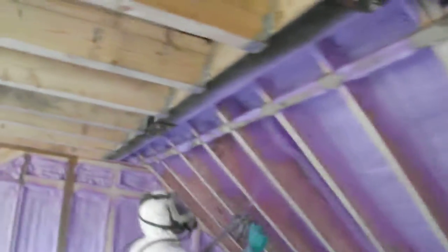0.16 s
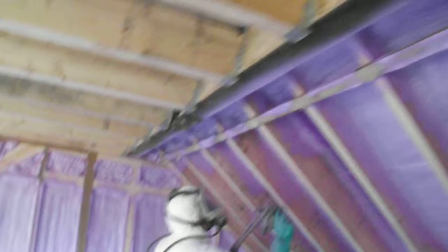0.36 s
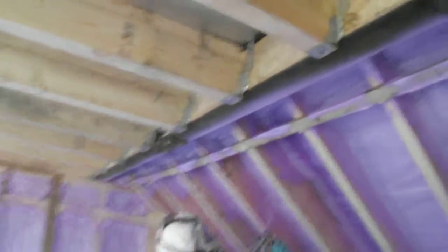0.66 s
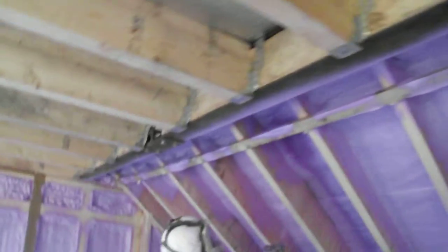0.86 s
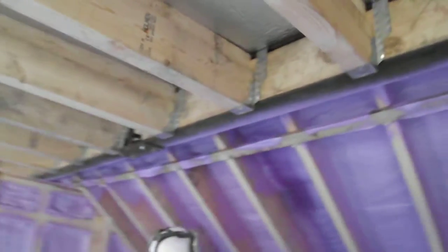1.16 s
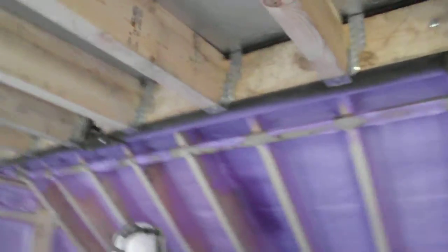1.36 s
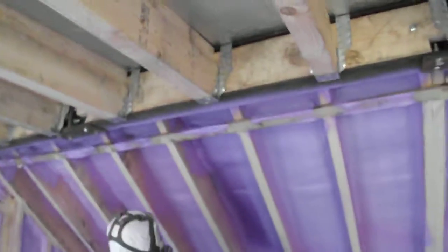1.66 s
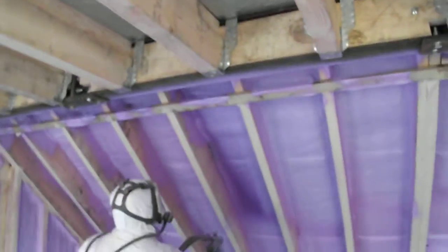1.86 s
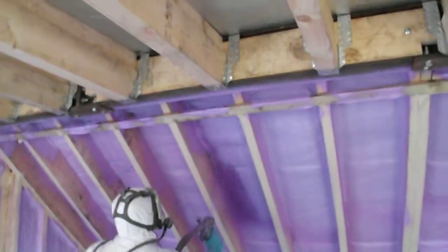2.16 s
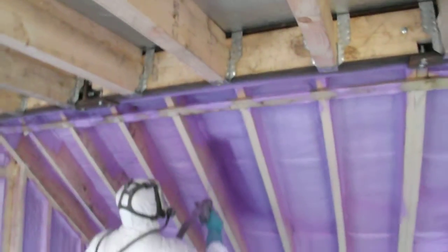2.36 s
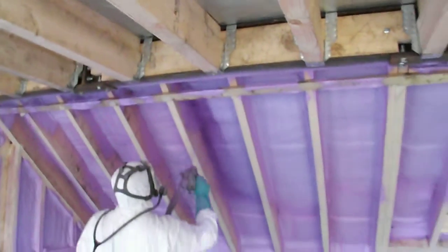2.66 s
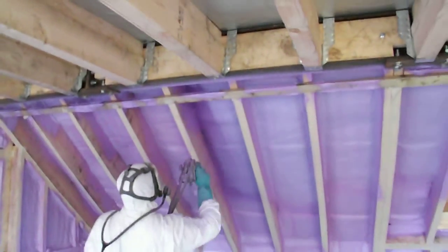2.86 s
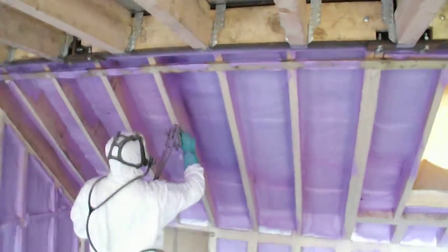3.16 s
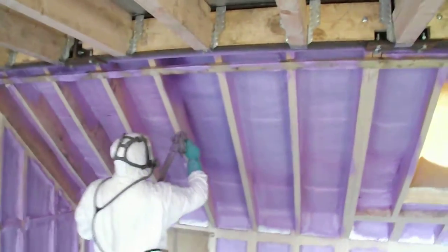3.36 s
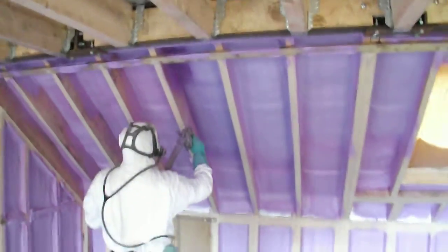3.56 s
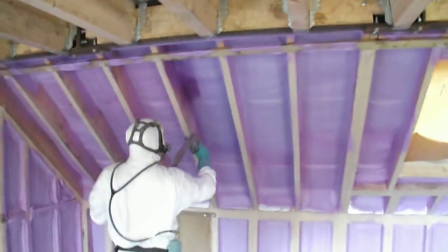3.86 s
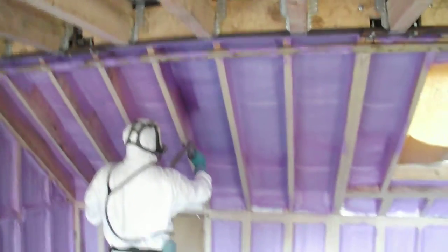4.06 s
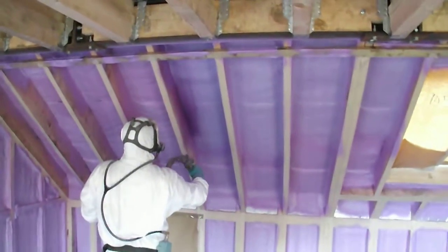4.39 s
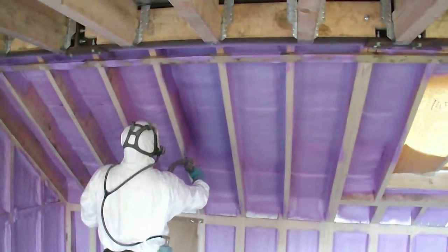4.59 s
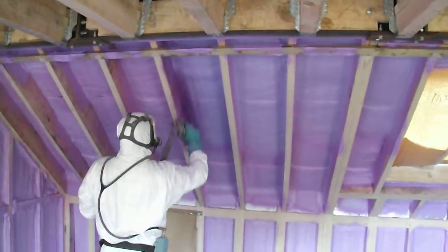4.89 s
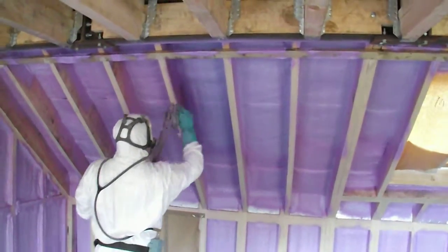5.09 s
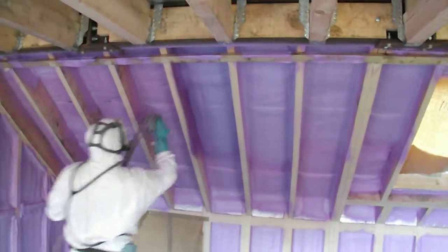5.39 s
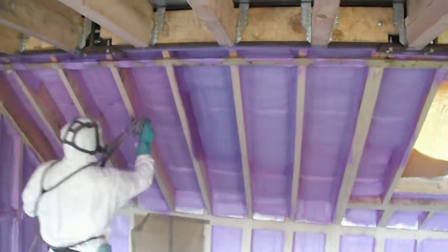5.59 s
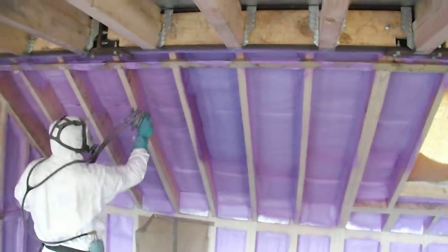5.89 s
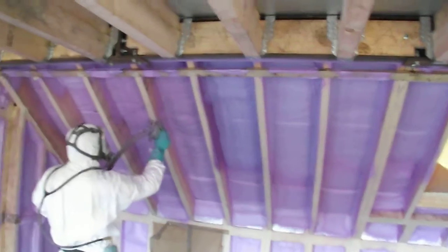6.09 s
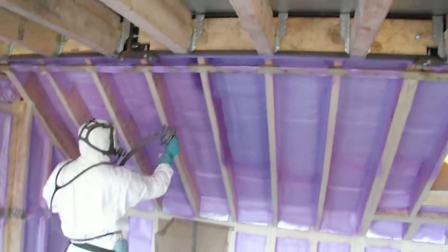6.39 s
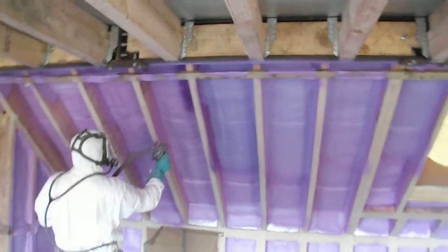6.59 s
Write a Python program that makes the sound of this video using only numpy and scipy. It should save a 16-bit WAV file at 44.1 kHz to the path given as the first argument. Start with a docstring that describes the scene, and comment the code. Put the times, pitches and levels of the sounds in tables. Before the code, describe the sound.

A spray gun roars wet, spattering foam in short bursts, hissing out between passes, while hard wooden knocks crack through a timber loft.

```python
"""A spray gun lays foam on a roof slope in a timber loft, over a steady faint hose leak. It opens mid-pass:
the held trigger gives a wet, spattering roar of filtered noise and clicks, with low flutter from handling.
Letting go brings bleeding air and fuzzy notes of resonant noise, then a thin hiss with purge puffs, pass by pass.
Between 0.3 and 5.1 s come four knocks on the timbers, the last one soft: noise rattles, low pushes and ringing
resonances. Hard ones overload the small microphone; its port peak near 3 kHz is in the gun and knock spectra."""
import sys
import numpy as np
from scipy import signal
from scipy.io import wavfile
from scipy.ndimage import uniform_filter1d

SR = 44100
rng = np.random.default_rng(int(sys.argv[2]) if len(sys.argv) > 2 else 0)


def output_pcm(signal):
    """Save a mono or channel-first signal as 16-bit PCM at the path in sys.argv[1].

    Samples are clipped to [-1, 1] before scaling.
    """
    pcm = np.clip(np.atleast_2d(signal).T, -1, 1) * 32767
    wavfile.write(sys.argv[1], SR, np.round(pcm).astype(np.int16))


def how_loud(loudness_db):
    """Turn decibels into a plain amplitude multiplier (0 dB gives 1, 20 dB gives 10)."""
    steps = np.asarray(loudness_db, float) / 20
    return 10 ** steps


N = 297234


def evened(x):
    """Scales to rms 1."""
    return x / np.sqrt(np.mean(x ** 2) + 1e-20)


def read(points, hz):
    """Reads a table on a log-frequency axis."""
    f, value = np.transpose(points)
    return np.interp(np.log(hz + 1), np.log(f + 1), value)


def colour(x, points):
    """Minimum-phase filter with the given spectrum, so that each click rings only after itself."""
    level_db = np.maximum(read(points, np.fft.rfftfreq(8192, 1 / SR)), -100)
    half = np.log(how_loud(level_db))
    full = np.concatenate([half, half[-2:0:-1]])
    # the Hilbert transform of the log spectrum gives the matching phase
    response = np.exp(full - 1j * signal.hilbert(full).imag)
    taps = np.fft.ifft(response).real[:4096]
    return signal.oaconvolve(x, taps / np.linalg.norm(taps))[:len(x)]


def flutter(size):
    """Random wobble of rms 1, smoothed twice over size samples."""
    return evened(uniform_filter1d(uniform_filter1d(rng.standard_normal(N), size), size))


def follow(rows, column):
    """One column of a curve at every sample."""
    rows = np.array(rows)
    return np.interp(np.arange(N) / SR, rows[:, 0], rows[:, column])


def resonate(x, hz, width):
    """A steep resonance: two poles of the given width in Hz, passed twice."""
    r = np.exp(-np.pi * width / SR)
    poles = [1, -2 * r * np.cos(2 * np.pi * hz / SR), r * r]
    return signal.lfilter([1], poles, signal.lfilter([1, 0, -1], poles, x))


def spatter(per_second, spread_db):
    """Random clicks, a few of them large, scaled to rms 1."""
    size = how_loud(spread_db * np.minimum(rng.exponential(1, N), 5))
    sign = rng.choice([-1, 1], N)
    return evened(size * sign * (rng.random(N) < per_second / SR))


def shape(start, rise, hold, fall_db, from_db=-25):
    """Gain that climbs from from_db, holds at 1 and falls by fall_db per second, with a 10 ms fade-in."""
    t = np.arange(N) / SR - start
    climb_db = from_db * np.clip(1 - t / max(rise, .001), 0, 1)
    drop_db = fall_db * np.maximum(t - rise - hold, 0)
    return how_loud(climb_db - drop_db) * np.clip(t / .01, 0, 1)


# how fast the loft's echoes die: (frequency [Hz], t60 [s])
LOFT_T60 = [(100, 0.53), (400, 0.32), (1100, 0.25), (3000, 0.46), (8000, 0.2)]


def loft(x):
    """Sparse echoes of random sign, each band dying at its own speed."""
    taps = np.zeros(SR)
    at = np.arange(200, SR - 20, 20)
    taps[at + rng.integers(0, 20, len(at))] = rng.choice([-1., 1.], len(at))
    hz, t, z = signal.stft(taps, SR, nperseg=256)
    t60 = np.maximum(read(LOFT_T60, hz), .05)[:, None]
    tail = signal.istft(z * how_loud(-60 * t / t60), SR, nperseg=256)[1]
    return signal.oaconvolve(x, tail / np.linalg.norm(tail))[:N]


# spectrum of the leaking hoses: (frequency [Hz], relative level [dB])
LEAK_SPECTRUM = [(120, -82), (200, -19), (364, -12.5), (437, -14), (564, -15), (1560, -9), (2170, -10),
                 (4090, -4.5), (15400, -32)]


def hose_leak():
    """Steady faint leak of air from the hoses, as coloured noise."""
    return how_loud(-35.5) * evened(colour(rng.standard_normal(N), LEAK_SPECTRUM))


# passes over the slope: (trigger pulled [s], swell [s], trigger held with the swell [s])
TRIGGER_PASSES = [(-.3, .2, 0.61), (0.659, 0.13, .88), (2.128, 0.21, .62), (3.22, 0.24, 1.06),
                  (4.631, 0.14, 0.28), (5.085, 0.25, 0.807), (6.13, 0.23, 0.586)]
# the stream while the nozzle sweeps, with the trigger held; its level dips after the third knock,
# as if the recorder's gain ducks and recovers:
# (time [s], hiss [dB], foam roar re hiss [dB], treble re hiss [dB], upper shoulder re hiss [dB])
STREAM_CURVE = [(0, -12.5, -19, -18, -11), (.2, -14.5, -17, -18.5, -8.5), (.55, -21, -10, -15.5, -10.5),
                (.82, -15, -17, -19.5, -11), (.95, -17, -17.5, -18, -9.5), (1.44, -14.5, -13.5, -15, -4.5),
                (1.65, -13, -14.5, -18, -7.5), (2.39, -14.5, -16.5, -19.5, -11), (2.72, -15, -18, -18, -11),
                (2.82, -5, -7, -19.5, -10), (3.0, -13, -17, -18, -12), (3.25, -18.5, -14.5, -20, -9),
                (3.49, -13, -17.5, -21.5, -13), (3.57, -17, -15.5, -21, -13), (3.69, -12, -17.5, -21, -15),
                (3.84, -25.5, -14, -20.5, -9), (4.02, -14, -14, -18, -9.5), (4.22, -16, -14, -17.5, -6),
                (4.77, -18, -17.5, -19, -12.5), (4.88, -12, -19, -24, -13), (5.15, -17.5, -9.5, -10, -8.5),
                (5.33, -14.5, -14.5, -15.5, -13), (5.7, -19.5, -18, -4, -4), (5.88, -12.5, -14, -12, -9.5),
                (6.0, -21, -11, -17, -7), (6.35, -16, -15, -18.5, -12), (6.54, -15, -11.5, -18, -10),
                (6.64, -17.5, -19, -18, -9), (6.74, -13, -14.5, -21, -10.5)]


def stream_gain():
    """Each pull of the trigger lets the stream swell; letting go cuts it."""
    fall_db_per_s, swell_from_db = 450, -13
    trigger = sum(shape(start, swell, held - swell, fall_db_per_s, swell_from_db)
                  for start, swell, held in TRIGGER_PASSES)
    return trigger * how_loud(follow(STREAM_CURVE, column=1))


# spectrum of the foam at the microphone: (frequency [Hz], relative level [dB])
FOAM_SPECTRUM = [(35, -42), (60, -21), (107, -28), (201, -23.5), (305, -16.5), (385, -18.5), (422, -18),
                 (754, -16.5), (997, -16.5), (2200, -9.5), (3180, 3), (4110, -7), (5180, -16),
                 (9700, -23.5), (15400, -45)]


def wet_foam(foam_share):
    """Droplets and blobs click amid fluttering noise; a thick stream adds only low roar."""
    droplets = spatter(per_second=1600, spread_db=1.5)
    blobs = spatter(per_second=40, spread_db=3.5)
    rush = rng.standard_normal(N) * how_loud(0.7 * flutter(size=60))
    stream = rush + 0.36 * droplets + 0.1 * blobs
    foam = evened(colour(stream * how_loud(1.06 * flutter(size=600)), FOAM_SPECTRUM))
    low = signal.sosfilt(signal.butter(2, 1500, fs=SR, output="sos"), foam)
    return np.minimum(foam_share, 1) * foam + np.maximum(foam_share - 1, 0) * low


def beam(jet):
    """The nozzle beams its treble, so its aim tilts the spectrum; random patches roughen the jet."""
    usual_treble_db, usual_shoulder_db = -16, -11  # re hiss, in a plain full pass
    treble_db, shoulder_db = follow(STREAM_CURVE, column=3), follow(STREAM_CURVE, column=4)
    clock = np.arange(N) / SR
    hz, t, z = signal.stft(jet, SR, nperseg=256)  # short frames keep the spatter sharp
    aim_db = np.interp(t, clock, treble_db - usual_treble_db)
    beamed = np.clip(np.log2(hz / 4200 + 1e-9) / 0.88, 0, 1.05)[:, None]
    top = 1.8 * np.log2(np.maximum(hz / 11500, 1))[:, None]  # the very top rises only near the beam
    tilt_db = beamed * aim_db + top * np.maximum(aim_db, 0)
    # the jet's own peak rides above the port resonance
    peak = np.exp(-((hz - 4400) / 700) ** 2)[:, None]
    peak_db = peak * np.interp(t, clock, shoulder_db - usual_shoulder_db)
    patches = uniform_filter1d(rng.standard_normal(z.shape), size=3, axis=0)
    patches_db = 1.38 * evened(uniform_filter1d(patches, size=40, axis=1))
    return signal.istft(z * how_loud(tilt_db + peak_db + patches_db), SR, nperseg=256)[1][:N]


# air bleeding off as the trigger is let go: (start [s], level [dB], hold [s], fall [dB/s])
AIR_BLEEDS = [(0.243, -12, 0.023, 128), (1.538, -14, 0.036, 158), (2.752, -10, 0.026, 134),
              (4.253, -11.5, 0.052, 242), (4.897, -10, 0.018, 180), (5.89, -12.5, 0.055, 240),
              (6.698, -16, .02, 180)]
# purge puffs of air: (start [s], level [dB], hold [s], fall [dB/s])
PURGE_PUFFS = [(0.496, -13.5, .012, 107), (1.746, -12.5, 0.013, 138), (2.99, -14, 0.031, 203),
               (4.448, -13, 0.014, 142)]
# spectra at the microphone, air as the valve shuts and purge puff: (frequency [Hz], relative level [dB])
AIR_SPECTRUM = [(88, -86), (150, -74), (193, -59), (332, -46), (780, -47), (1130, -36), (1660, -13),
                (2180, -20.5), (2700, -12.5), (3270, 2), (3750, -11.5), (5000, -24), (8460, -31),
                (9330, -24.5), (15400, -55)]
PUFF_SPECTRUM = [(180, -69), (300, -87), (404, -69), (492, -47), (610, -27), (662, -29), (1160, -25.5),
                 (1640, -12), (1870, -15.5), (3170, 1.5), (5550, -17.5), (9890, -24.5), (15400, -46)]


def gun():
    """Spattering foam while the trigger is held, then turbulent air bleeds off and purges in puffs."""
    full_foam_db = -17  # roar re hiss in a plain full pass
    bleed_rise_s, puff_rise_s, idle_air_db = 0.022, 0.033, -34.5
    foam_share = np.clip(how_loud(follow(STREAM_CURVE, column=2) - full_foam_db), 0, 2.5)
    flow = stream_gain()
    bleed = sum(how_loud(db) * shape(start, bleed_rise_s, hold, fall_db)
                for start, db, hold, fall_db in AIR_BLEEDS)
    purge = sum(how_loud(db) * shape(start, puff_rise_s, hold, fall_db)
                for start, db, hold, fall_db in PURGE_PUFFS)
    turbulence = rng.standard_normal(N) * how_loud(1.53 * flutter(size=60) + 0.16 * flutter(size=500))
    # air fills what the foam leaves of the stream
    air_gain = np.sqrt(np.maximum(1 - foam_share ** 2, .02) * flow ** 2 + bleed ** 2)
    air = air_gain * evened(colour(turbulence, AIR_SPECTRUM))
    # turbulence played backwards keeps the puffs apart from the air
    puffs = (purge + how_loud(idle_air_db)) * evened(colour(turbulence[::-1], PUFF_SPECTRUM))
    return beam(flow * wet_foam(foam_share) + air + puffs)


# gusts and jolts at the microphone: (start [s], hold [s], deep flutter [dB], thudding [dB])
GUSTS_AND_JOLTS = [(-.03, .05, -26, -30.5), (.1, 0.078, -43, -37), (1.266, 0.083, -43, -44.5),
                   (1.65, 0.059, -43, -40), (2.453, 0.042, -34, -61), (3.34, 0.041, -31.5, -28),
                   (4.78, 0.068, -38, -46), (5.27, 0.32, -21.5, -43), (5.662, 0.15, -30, -40),
                   (5.99, .06, -36, -72), (6.47, 0.056, -23.5, -35), (6.686, .05, -23, -46)]
# spectrum of the deep flutter: (frequency [Hz], relative level [dB])
RUMBLE_SPECTRUM = [(8, -12), (15, 0), (22, -8), (32, -18), (60, -30), (120, -40), (250, -60)]
# buffeting by the stream's draught, re the stream: (deep flutter [dB], thudding [dB])
DRAUGHT_LEVELS = (-28.5, -38)
# buffeting in still air: (deep flutter [dB], thudding [dB])
CALM_LEVELS = (-44.5, -52)


def handling():
    """Draught and gusts buffet the hand-held microphone: a deep noise flutter and a duller resonant thudding."""
    rise_s, fall_db_per_s = 0.023, 123
    gusts = [shape(start, rise_s, hold, fall_db_per_s) for start, hold, *_ in GUSTS_AND_JOLTS]
    gust_levels = np.transpose(GUSTS_AND_JOLTS)[2:]
    draught = stream_gain()
    deep_gain, thud_gain = (how_loud(calm_db) + how_loud(draught_db) * draught + how_loud(gust_db) @ gusts
                            for calm_db, draught_db, gust_db in zip(CALM_LEVELS, DRAUGHT_LEVELS, gust_levels))
    deep = colour(rng.standard_normal(N), RUMBLE_SPECTRUM)
    # level the noise, so that gusts keep up without long lulls
    deep /= np.sqrt(uniform_filter1d(deep ** 2, size=3000)) + .2 * np.std(deep)
    thud = resonate(rng.standard_normal(N), hz=71, width=133)
    return evened(deep) * deep_gain + evened(thud) * thud_gain


# short fuzzy notes, the high ones as the valve shuts:
# (middle [s], half length to 1/e [s], pitch [Hz], pole width [Hz], level [dB])
FUZZY_NOTES = [(0.184, 0.032, 316, 33, -28.5), (0.183, 0.016, 196, 38, -25), (0.29, 0.036, 1950, 230, -22),
               (1.56, 0.022, 1860, 260, -23.5), (1.626, 0.07, 1740, 69, -37), (2.8, 0.042, 1930, 180, -26),
               (3.214, 0.0066, 308, 38, -44), (5.875, 0.019, 494, 24, -26), (6.417, .03, 311, 20, -33),
               (6.489, 0.007, 298, 30, -26), (6.545, 0.024, 321, 23, -26)]


def hollow_notes():
    """Brief fuzzy notes: resonant noise under a soft swell."""
    out = np.zeros(N)
    for middle, length, hz, width, db in FUZZY_NOTES:
        swell = np.exp(-((np.arange(N) / SR - middle) / length) ** 2)
        out += how_loud(db) * swell * evened(resonate(rng.standard_normal(N), hz, width))
    return out


# blows on the timbers: (time [s])
BLOW_TIMES = [.3425, 1.9628, 3.692, 5.09]
# the same blows: (crack [dB], boom [dB], wood ring [dB], rattle decay to 1/e [s])
BLOWS = [(1.5, -23, -22.5, 0.0043), (2.5, -27, -20.5, 0.0056), (3.5, -18, -16.5, 0.022),
         (-25, -57, -27.5, 0.044)]
# spectrum of the crack: (frequency [Hz], relative level [dB])
CRACK_SPECTRUM = [(290, -35), (500, -7), (670, -7.5), (1750, -15.5), (2470, -6.5), (3350, -2.5),
                  (4990, -28.5), (5550, -25.5), (9570, -52), (12000, -42), (15600, -67), (22000, -120)]
# timber resonances, re the boom under 200 Hz and re the wood ring above:
# (frequency [Hz], pole width [Hz], level [dB], t60 [s])
TIMBER_MODES = [(70, 56, -8, 1), (108, 24, -1, 1), (147, 37, 3.5, 0.69), (180, 69, 5, 0.26),
                (257, 53, -9, 0.61), (336, 51, -10.5, 0.89), (436, 180, -10, 0.68), (624, 230, -3.5, 0.41),
                (690, 195, -1.5, 0.47), (945, 58, 0.5, 0.14), (1070, 120, -7.5, 0.41),
                (1454, 440, -2.5, 0.42)]


def knocks():
    """Each blow is a low push and a short rattle of noise; loose timbers go on rumbling in their resonances."""
    push_hz, push_decay_s, push_db = 70, 0.01, 17  # level re the boom
    crack, ring = np.zeros(N), np.zeros(N)
    t = np.arange(SR) / SR
    rise = np.minimum(t / .001, 1)
    push = np.sin(2 * np.pi * push_hz * t) * np.exp(-t / push_decay_s)
    for start, (crack_db, boom_db, wood_db, decay_s) in zip(BLOW_TIMES, BLOWS):
        at = round(start * SR)
        rattle = rng.standard_normal(SR) * rise * np.exp(-t / decay_s)
        crack[at:at + SR] += how_loud(crack_db) * colour(rattle, CRACK_SPECTRUM)
        ring[at:at + SR] -= how_loud(boom_db + push_db) * push
        for hz, width, db, t60 in TIMBER_MODES:
            level_db = (boom_db if hz < 200 else wood_db) + db - 60 * t / t60
            # drop the first second, while the resonance builds up
            shake = evened(resonate(rng.standard_normal(2 * SR), hz, width)[SR:])
            ring[at:at + SR] += how_loud(level_db) * shake * rise
    return crack + how_loud(-7.5) * loft(crack) + ring


def scene():
    """Leak, gun with a little of the loft, handling, notes and knocks at one microphone."""
    spray = gun()
    mix = hose_leak() + spray + how_loud(-14.0) * loft(spray) + handling() + hollow_notes() + knocks()
    return mix[None]


def low_pass(x):
    """Removes everything above the highest recorded frequency."""
    return signal.sosfilt(signal.butter(12, 15780, fs=SR, output="sos"), x)


def record(dry):
    """The microphone loses the deepest bass and the converter clips the loudest blows."""
    thinned = signal.sosfilt(signal.butter(2, 15, "high", fs=SR, output="sos"), dry)
    mix = np.clip(thinned, -.99, .99)
    return low_pass(mix)


dry = scene()
out = record(dry)
output_pcm(out)
```